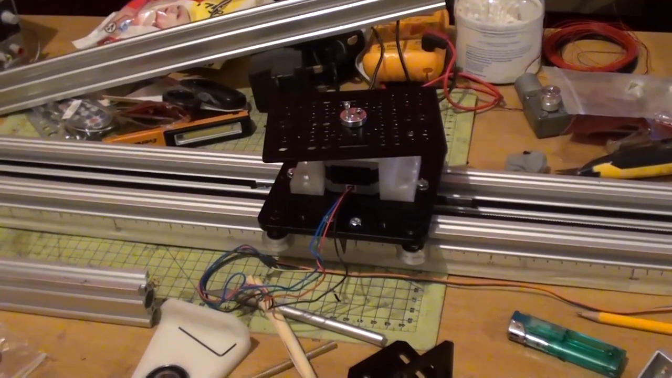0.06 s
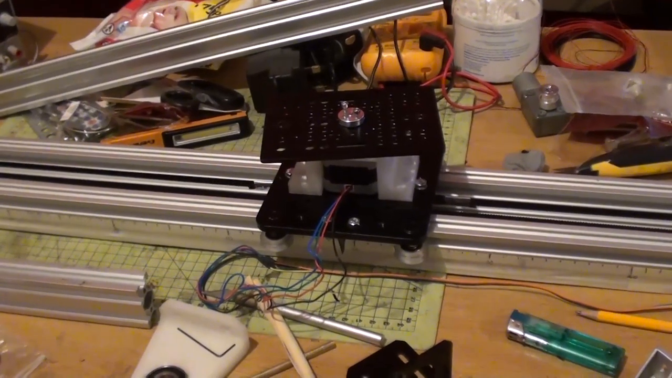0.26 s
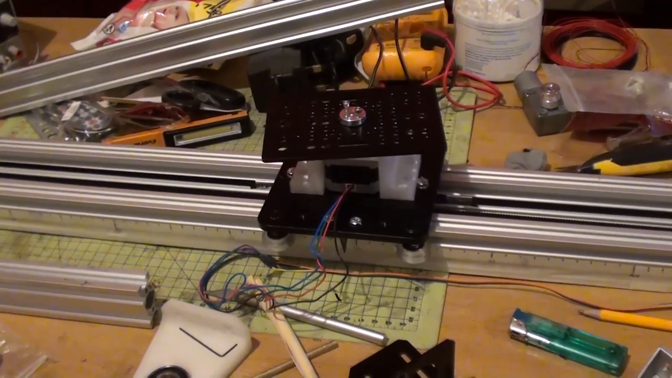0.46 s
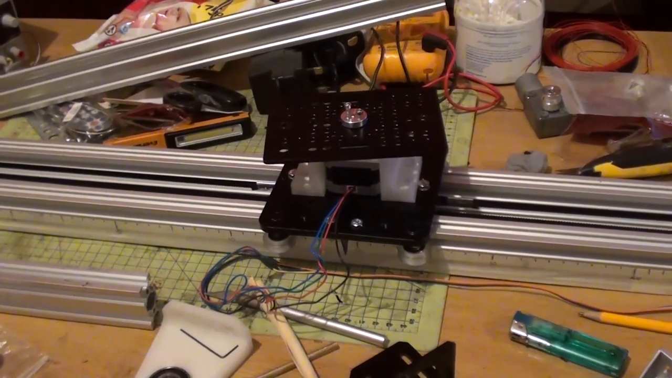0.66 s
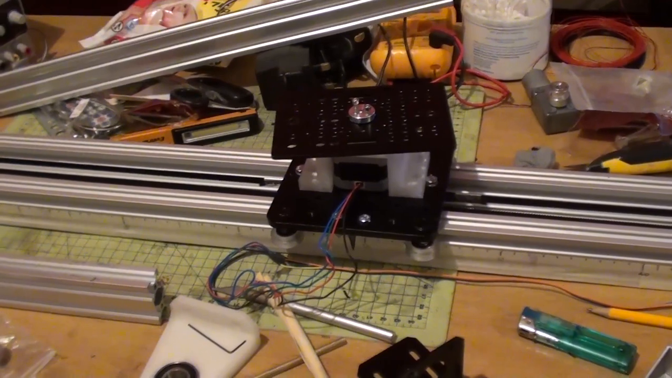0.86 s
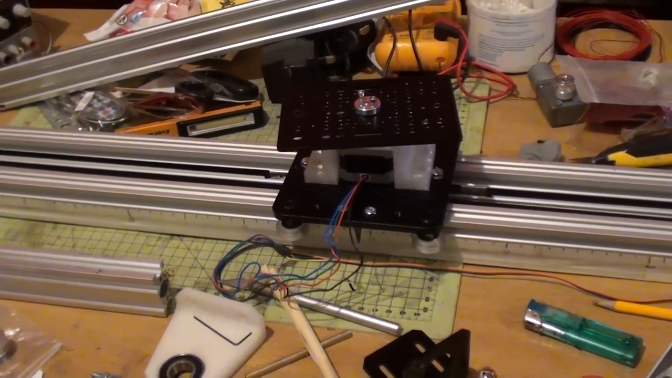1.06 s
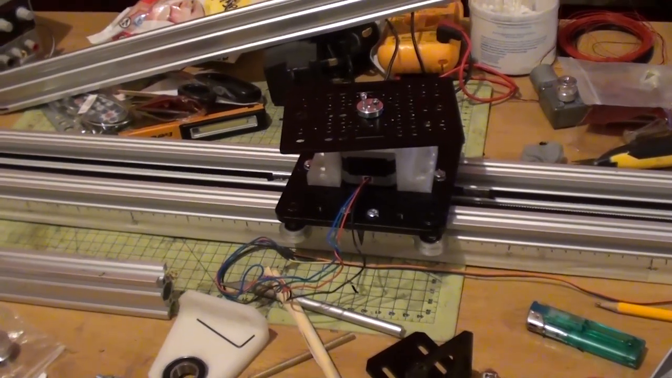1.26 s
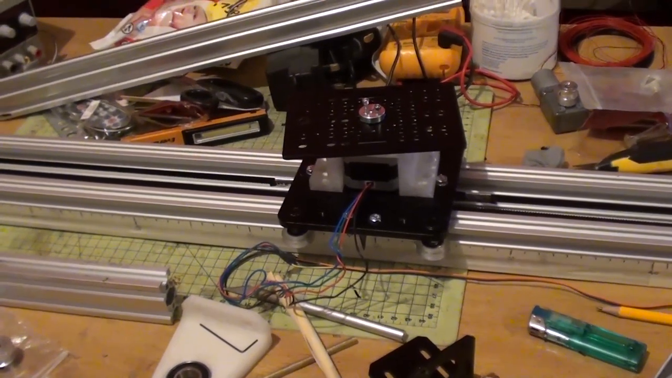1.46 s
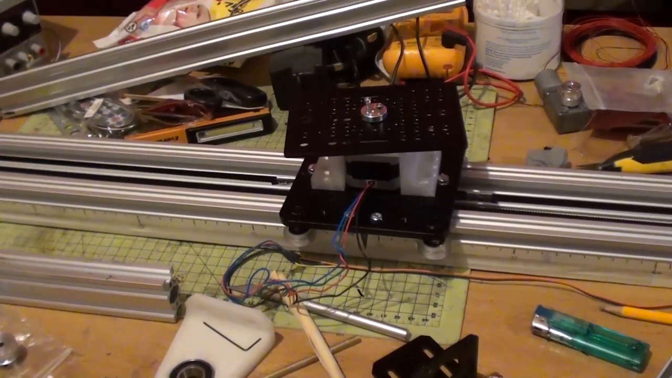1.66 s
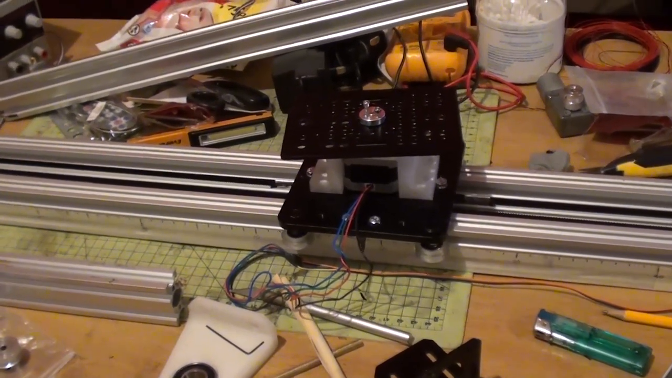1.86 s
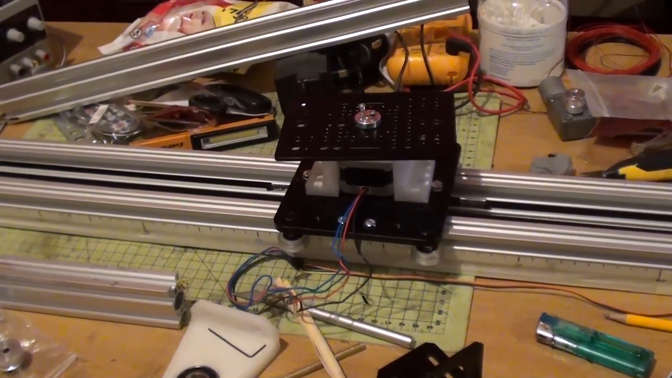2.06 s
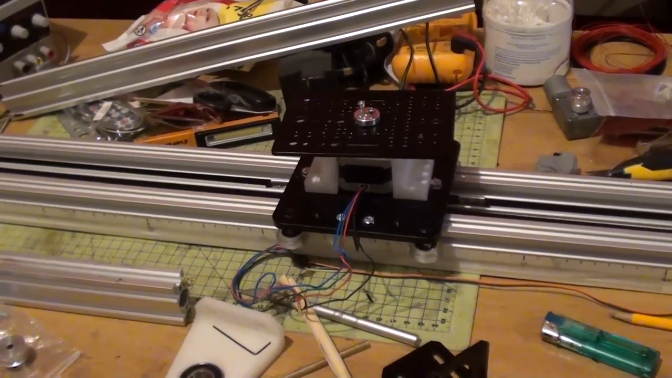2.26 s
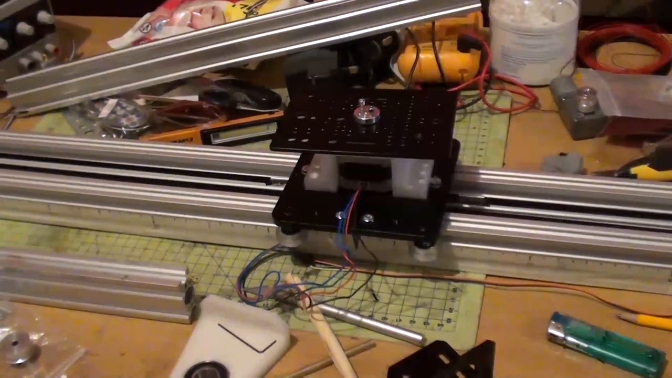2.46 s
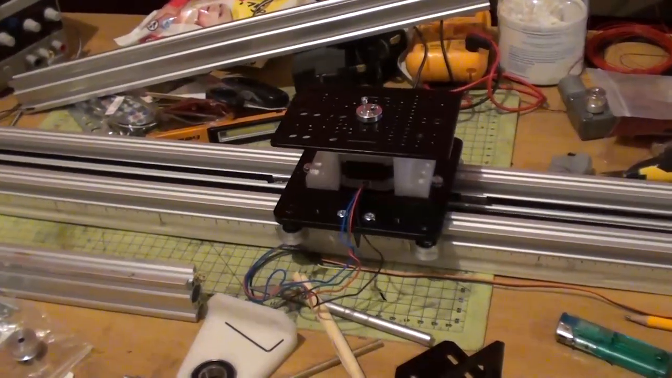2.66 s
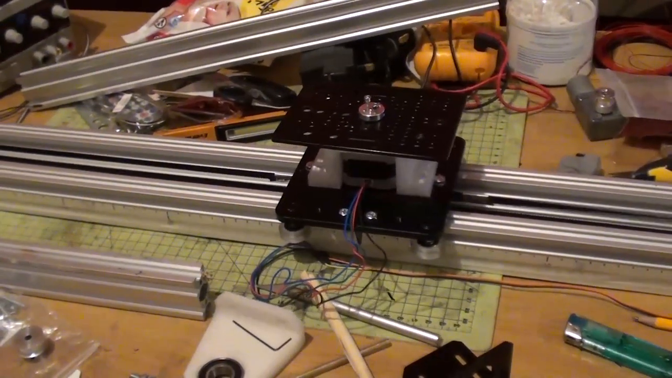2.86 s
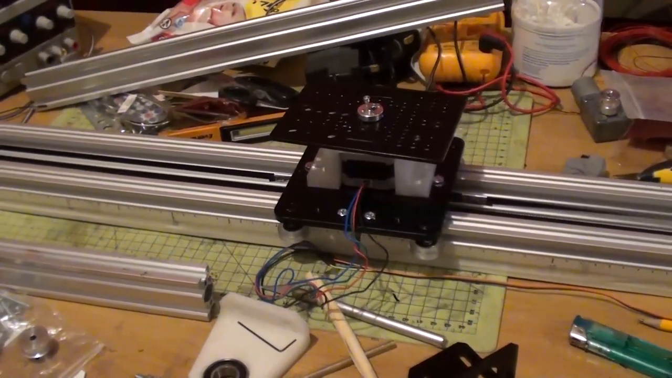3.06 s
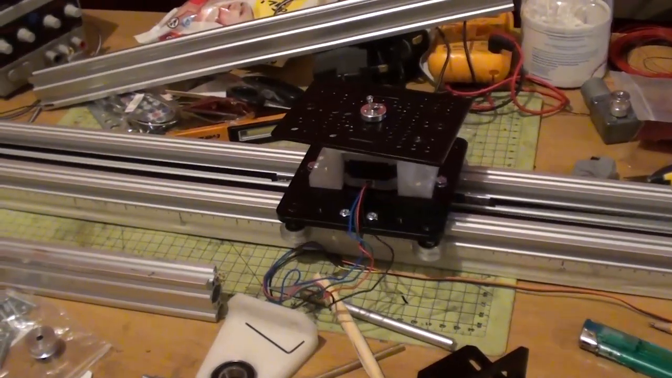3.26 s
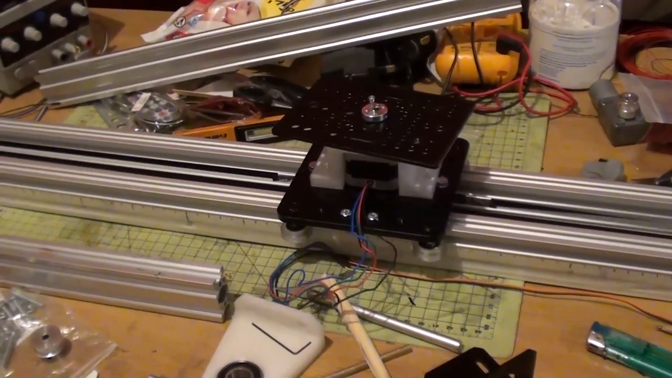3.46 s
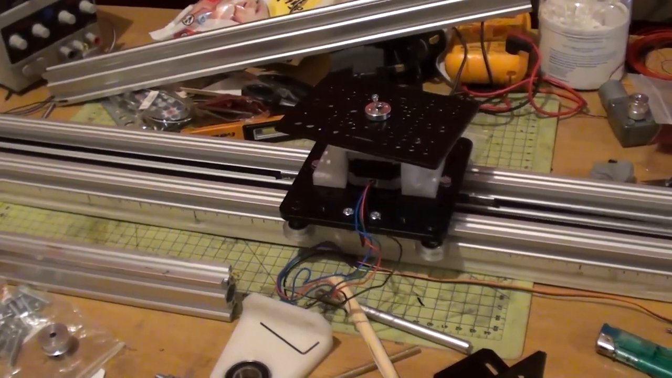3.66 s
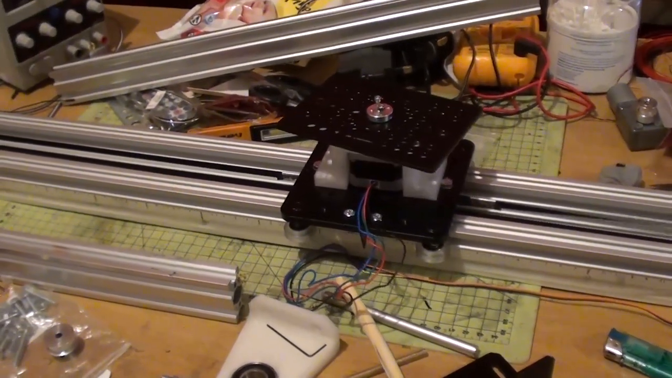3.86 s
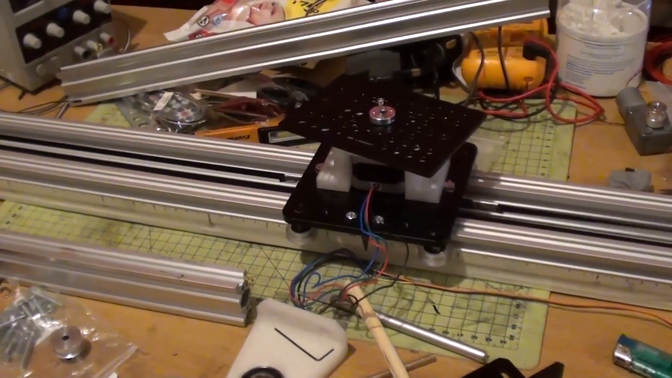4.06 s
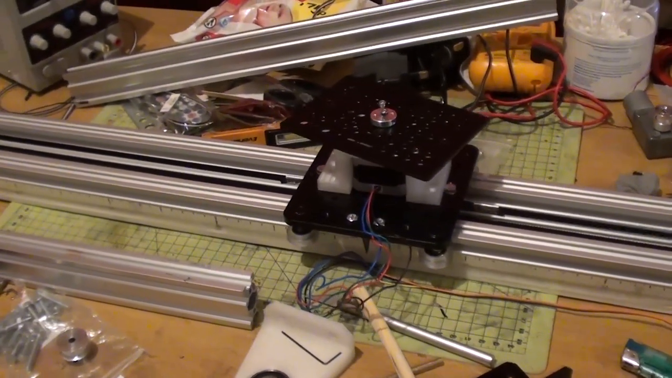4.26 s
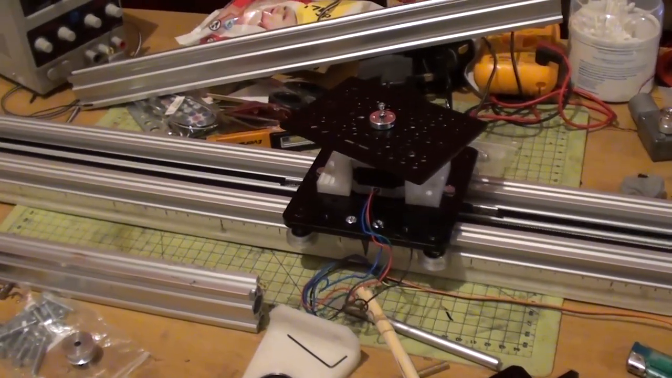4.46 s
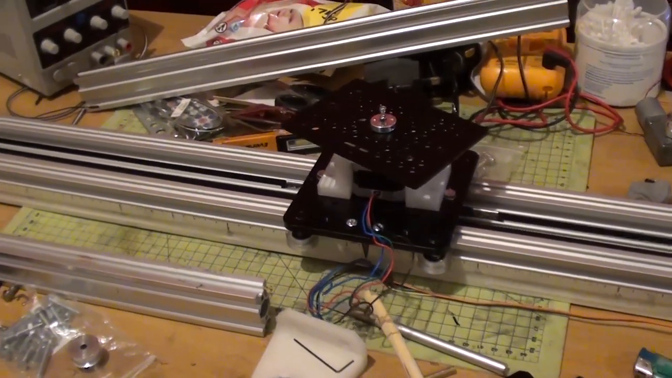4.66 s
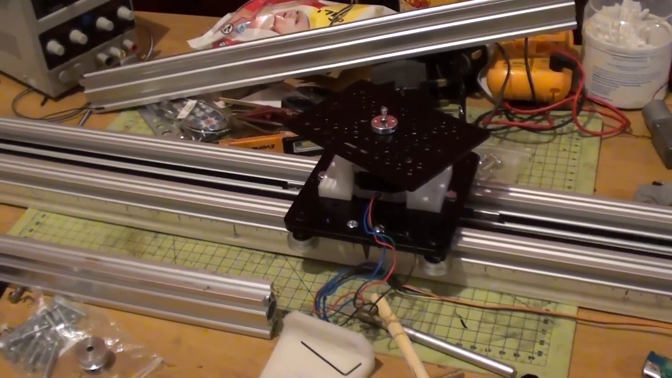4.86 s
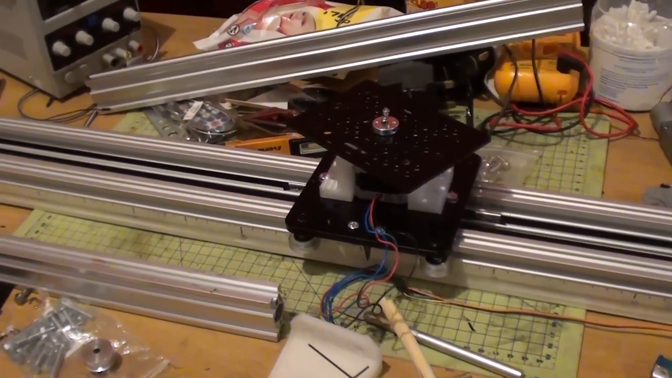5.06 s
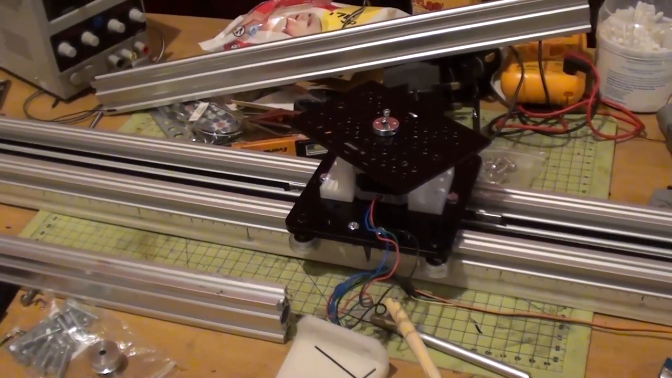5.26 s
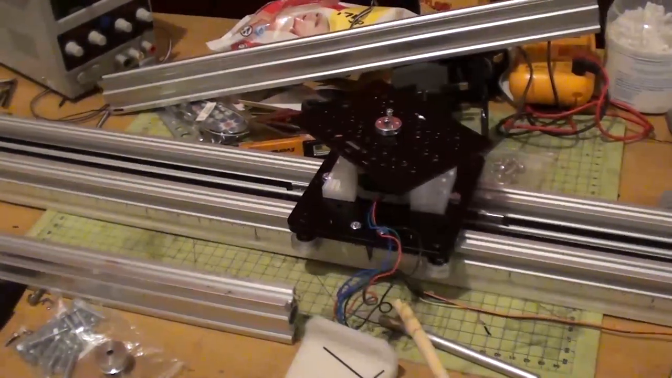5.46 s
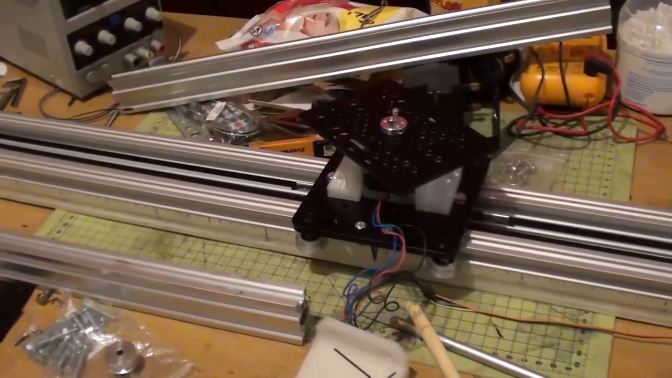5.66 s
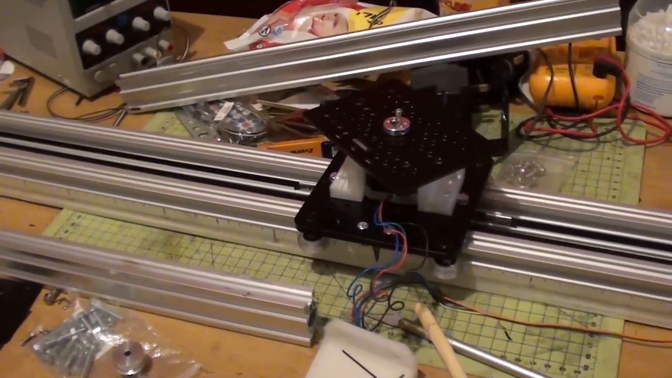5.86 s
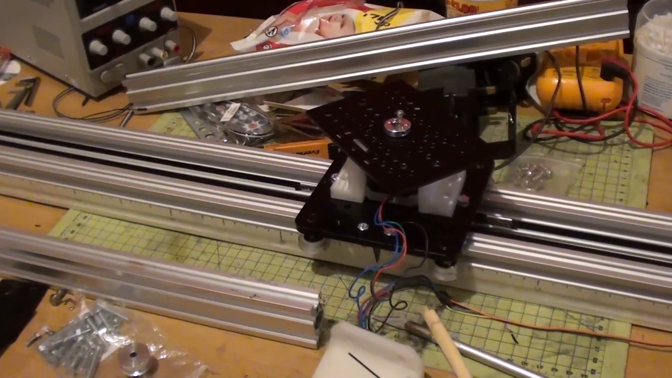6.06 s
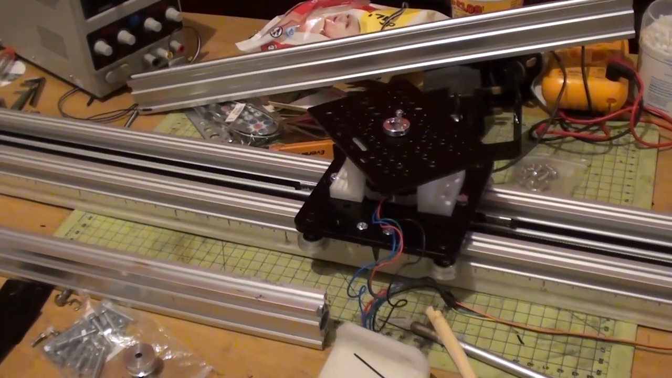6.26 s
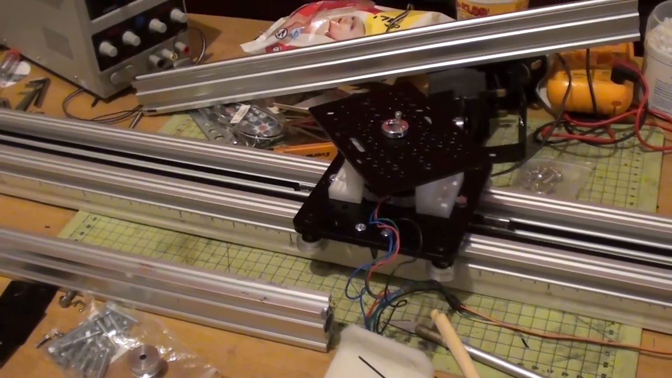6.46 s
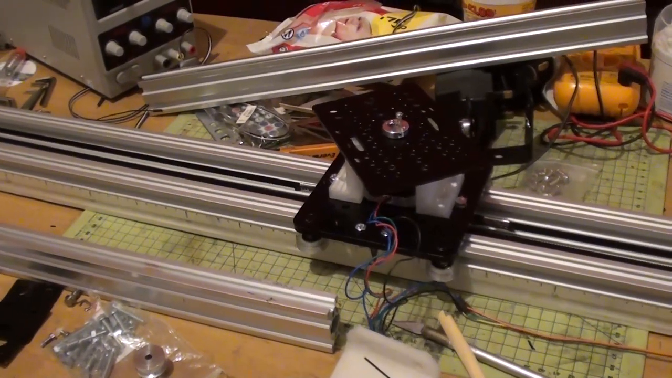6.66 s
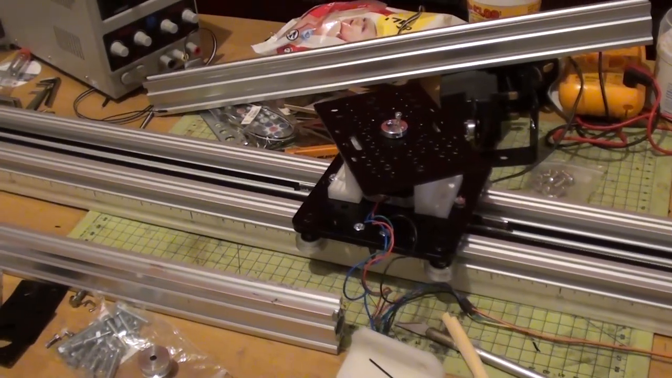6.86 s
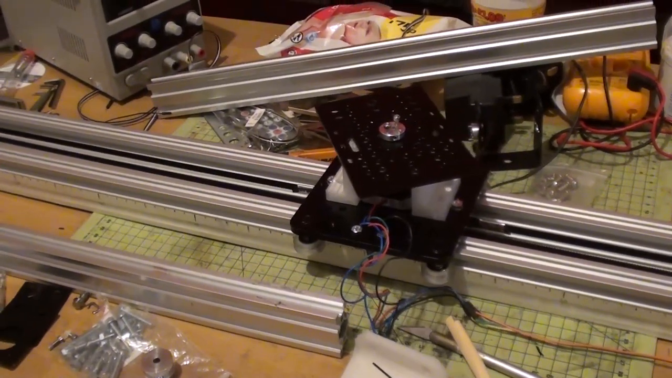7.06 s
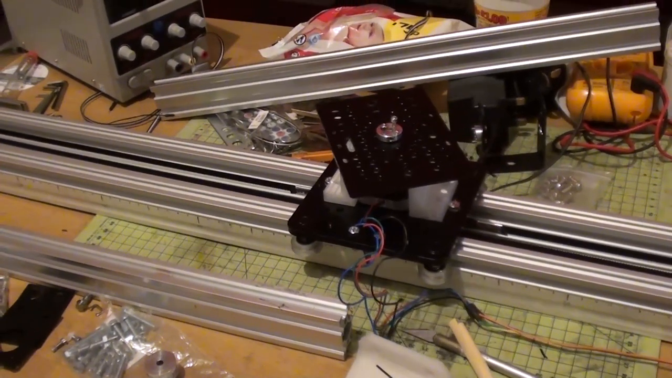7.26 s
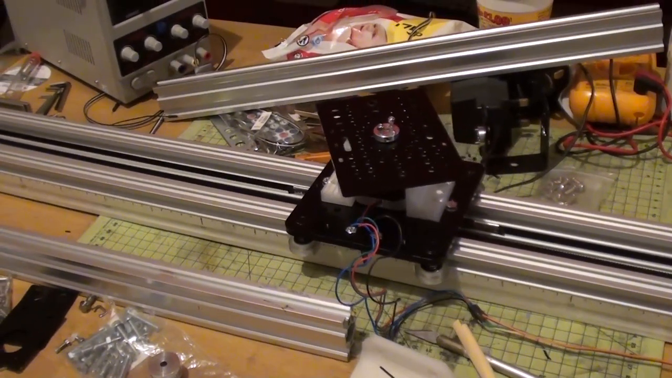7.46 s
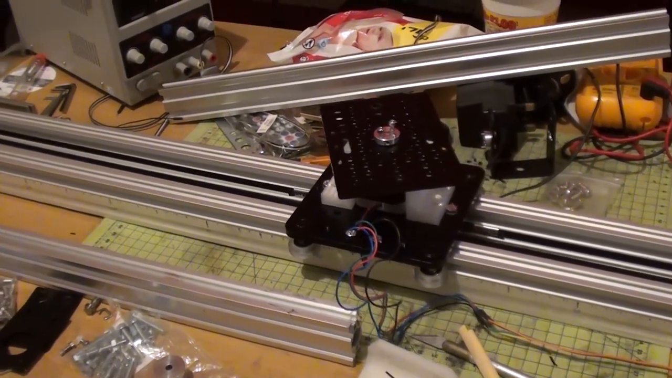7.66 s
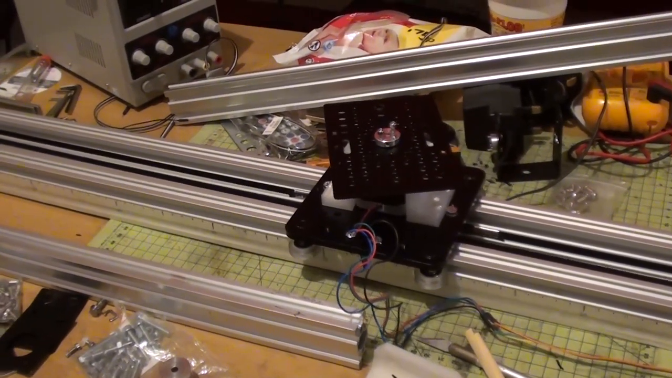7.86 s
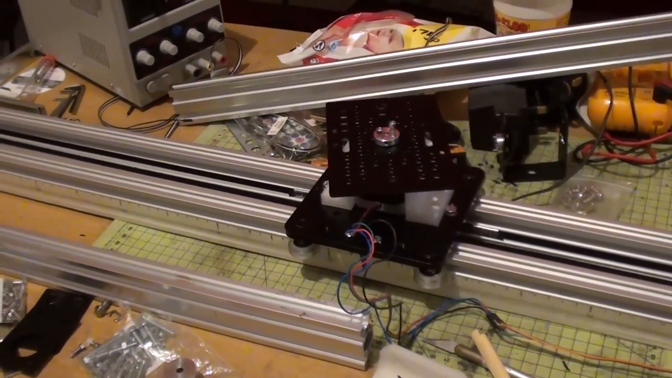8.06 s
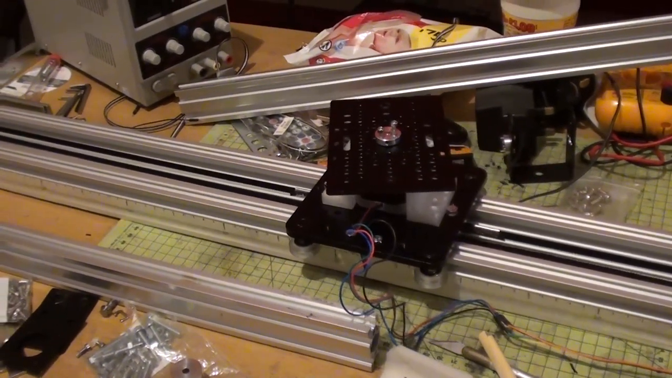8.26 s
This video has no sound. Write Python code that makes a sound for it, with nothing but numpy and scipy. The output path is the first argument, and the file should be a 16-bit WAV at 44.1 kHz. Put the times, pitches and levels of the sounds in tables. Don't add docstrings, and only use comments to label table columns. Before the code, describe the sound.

A switch clicks, a small motor sweeps up within half a second and drones at fixed pitch, with a passing loose rattle and thin squeals.

```python
import sys
import numpy as np
from scipy import signal
from scipy.fft import rfft, irfft
from scipy.io import wavfile
from scipy.ndimage import uniform_filter1d

SR = 44100
rng = np.random.default_rng(int(sys.argv[2]) if len(sys.argv) > 2 else 0)


def volts(x):
    e = np.asarray(x, float) / 20
    return 10 ** e


def master_out(mix):
    frames = np.transpose(np.atleast_2d(mix))
    ceiling = np.clip(frames, -1, 1)
    pcm = np.round(ceiling * 32767).astype(np.int16)
    wavfile.write(sys.argv[1], SR, pcm)


N = 366912
T = np.arange(N) / SR
COIL_HZ, STEPS = 77.795, 16
EARS = np.array([[.5], [-.5]])


def read(table, off_db=-120):
    s, *columns = np.transpose(table)
    return [np.interp(T, s, column, off_db, off_db) for column in columns]


def unit(x):
    return x / np.sqrt(np.mean(x ** 2))


def sos(x, order, hz, kind="low"):
    return signal.sosfilt(signal.butter(order, hz, kind, fs=SR, output="sos"), x)


def ring(x, modes, treble_db=0):
    out = 0
    for k, (hz, width, db) in enumerate(modes):
        gain = (-1) ** k * volts(db + treble_db * (hz > 1500))
        out = out + gain * signal.lfilter(*signal.iirpeak(hz, hz / width, SR), x)
    return out


def coloured(spectrum):
    hz, db = np.transpose(spectrum)
    axis_hz = np.fft.rfftfreq(N, 1 / SR) + 1
    shape = volts(np.interp(np.log(axis_hz), np.log(hz), db))
    return unit(irfft(rfft(rng.standard_normal(N)) * shape, N))


def walk(rate):
    knots = rng.standard_normal(int(N / SR * rate) + 2)
    return 0.71 * np.interp(np.arange(N) * rate / SR, np.arange(len(knots)), knots)


def bumps(events, width_s):
    return sum(db * np.exp(-((T - s) / width_s) ** 2) for s, db in events)


def strikes(at, size):
    x, i = np.zeros(N + 2), np.clip(at, 0, N).astype(int)
    np.add.at(x, i, size * (1 - at % 1))
    np.add.at(x, i + 1, size * (at % 1))
    return x[:N]


def when(turns, marks):
    return np.interp(marks, turns, np.arange(N))


def place(x, pan_db):
    return x * volts(EARS * pan_db)


# t/s, share of full speed
SPEED = [(1.525, 0.), (1.526, .075), (1.6, .16), (1.661, 0.26), (1.74, .41), (1.82, .58), (1.95, 0.82),
         (2.04, 1.)]


def spin_up():
    speed = np.interp(T, *np.transpose(SPEED))
    return speed, np.cumsum(speed * COIL_HZ / SR + 1e-12)


# f/Hz, width/Hz, level/dB
FRAME = [(227, 20, 3.5), (380, 36, -11), (481, 9.1, 8), (717, 36, 2.5), (827, 48, -2.5), (1017, 10.7, 10.5),
         (1295, 10, 7.5), (1536, 75, -2), (1715, 42, 1), (2010, 9.6, -5), (2800, 19, 1), (2973, 15, -0.5),
         (3350, 40, -24), (4250, 92, -8.5)]
# t/s, level/dB
HUM = [(1.6, -63), (1.9, -42), (2.05, -41.5), (2.3, -39.5)]
# t/s, left minus right level/dB
STEP_PAN = [(2.05, 3.5), (2.92, 4.0), (3.83, 6), (4.91, 10), (5.28, 9), (5.73, 9.5), (7.11, 6.5), (7.8, 6),
            (8.32, 6)]
# multiple, mean level/dB, lobe depth/dB, loudest t/s
LOBES = [(1, -30, 0.7, 2.6), (2, -23.5, 3.0, 4.0), (3, -8.0, 1.5, 4.0), (4, -18.5, 5.0, 1.25),
         (5, -14.5, 5.5, 6.64), (6, -14.5, 1.0, 3.8), (7, -21.5, 1.4, 2.0), (8, -25.5, 10.0, 4.59),
         (9, -2.5, 1.3, 5.92), (10, -10.0, 4.0, 3.3), (11, -15.5, 4.4, 3.9), (12, -30.0, 2.0, 3.21),
         (13, -3.5, 0.9, 7.6), (14, -12.0, 1.0, 7.1), (15, -6.0, 3.5, 7.3), (16, -2.0, 3.0, 1.24),
         (17, -15.0, 2.6, 2.8), (18, -38.5, 15.0, 3.1), (19, -21.0, 3.0, 6.5), (20, -7.5, 2.0, 5.7),
         (21, -17.0, 5.0, 3.5), (22, -11.0, 0.1, 8.1), (23, -26.4, 3.2, 7.98), (25, -41.0, 18.0, 4.0),
         (31, -26.0, 4.5, 4.5), (32, -17.5, 3.5, 5.3), (33, -25.0, 7.6, 6.2), (34, -29.0, 0.0, 0.88),
         (35, -25.0, 4.0, 1.4), (42, -26.0, 6.5, 4.0)]
TURN_S = 8


def hum(turns, speed):
    axis_hz = np.arange(0, 3500, 5.)
    frame = sum(volts(db) / np.hypot(1, 2 * (axis_hz - hz) / width) for hz, width, db in FRAME)
    every = np.arange(0, N, 64)
    step_pan = read(STEP_PAN, off_db=3)[0][every]
    cycle = np.exp(2j * np.pi * turns)
    out, wave, reached = 0, np.ones(N, complex), 0
    for k, mean_db, lobe_db, loudest in LOBES:
        k = round(k)
        start, pan, lag = rng.uniform(-0.52, 1, 3)
        moving = np.interp(k * COIL_HZ * speed[every], axis_hz, frame)
        crossing = moving / np.interp(k * COIL_HZ, axis_hz, frame)
        lobe = lobe_db * np.cos(2 * np.pi * (every / SR - loudest) / TURN_S)
        gain = volts(mean_db + lobe + 0.78 * walk(6)[every]) * np.minimum(crossing, 3.)
        gain = gain * speed[every] ** (k * k / 100 + 6 / k ** 2)
        pan_db = step_pan if k == STEPS else 3.4 * pan * min(k / 9, 1)
        ears = place(gain, pan_db) * np.exp(1j * np.pi * start + .3j * lag * EARS)
        wave, reached = wave * cycle ** int(k - reached), k
        out = out + np.real(wave * np.repeat(ears, 64, axis=1)[:, :N])
    return np.sqrt(2) * out * volts(np.interp(T, *np.transpose(HUM), left=-120))


# t/s, level/dB
KICK = [(1.52, -28), (1.62, -34.5), (1.652, -36), (1.66, -30), (1.69, -33), (1.81, -32.5), (1.98, -32),
        (2.01, -41), (2.07, -70)]
# f/Hz, width/Hz, level/dB
ROTOR = [(233, 35, -9), (396, 24, -2.5), (479, 11, -5)]
SWING_DB, SWING_FALL_DB_S, SWING_BEAT_S, SWING_BEAT_DB, SWING_PEAK_S = 9, 55, .085, 1.5, 1.63


def kicks(turns):
    step = np.arange(25 * STEPS)
    chance = rng.standard_normal((len(step), 2)).T
    size = volts(6.5 * np.cos(2 * np.pi * (step / STEPS + .3)) + 1.5 * chance[0])
    push = sos(strikes(when(turns, (step + .04 * chance[1]) / STEPS), size), 2, 1500)
    since = np.clip(T - SWING_PEAK_S, -.1, None)
    force_db = read(KICK)[0]
    beat_db = SWING_BEAT_DB * np.cos(2 * np.pi * since / SWING_BEAT_S)
    swing_db = force_db + SWING_DB - SWING_FALL_DB_S * since + beat_db
    frame, rotor = ((push * volts(db))[:3 * SR] for db in (force_db, swing_db))
    return 30 * np.pad(ring(frame, FRAME) + ring(rotor, ROTOR), (0, N - len(frame)))


# f/Hz, level/dB per Hz
GRIND = [(60, -26), (150, -4.5), (350, 1), (800, -1.5), (1100, 3), (1700, -4.5), (2200, -8.5), (3000, -16),
         (4500, -16.5), (6500, -17), (8500, -16.5), (11000, -23), (16000, -25)]
# t/s, level/dB
GRIND_LEVEL = [(1.52, -62), (1.54, -53), (2.1, -47), (4.4, -46.5), (6.5, -47), (8.32, -46.5)]


def grind(turns):
    return coloured(GRIND) * volts(read(GRIND_LEVEL)[0] + 2 * np.cos(2 * np.pi * turns) + 0.92 * walk(12))


def whistle(hz, db, locked_hz, turns, width_hz, steady, duty, depth, patchy_db):
    band = (walk(width_hz) + 1j * walk(width_hz)) * np.exp(2j * np.pi * np.cumsum(hz) / SR)
    line = steady * np.cos(2 * np.pi * locked_hz * T + 0.3 * walk(25))
    gate = 1 - depth / (1 + np.exp(6 * (np.cos(2 * np.pi * (turns - .3)) + duty)))
    return unit((band.real + line) * gate * volts(patchy_db * walk(35))) * volts(db)


# t/s, f/Hz, level/dB
CHIRP = [(1.53, 7320, -61.5), (1.87, 7310, -62), (2.1, 7400, -57), (2.9, 7430, -55), (3.5, 7400, -52),
         (3.7, 7330, -53), (4.3, 7250, -52), (4.4, 7250, -61), (4.63, 7230, -63.5), (5.63, 7380, -59),
         (7.6, 7380, -58), (8.32, 7330, -60.5)]
# t/s, level over the chirp/dB
FLARES = [
    (1.55, 9.9),
    (1.61, 15),
    (8.09, 7.5),
    (8.23, 12),
]
FLARE_S = 0.0092
LOCKED = 96


def chirp(turns):
    tone = whistle(*read(CHIRP), LOCKED * COIL_HZ, turns,
                   width_hz=420, steady=0.63, duty=0.17, depth=0.63, patchy_db=-0.5)
    return volts(bumps(FLARES, FLARE_S)) * tone


# f/Hz, width/Hz, level/dB
RUMBLE = [(123, 29, -1), (145, 23, 0), (198, 16.7, 5.5)]
THUD = [(333, 43, 0.5), (371, 80, 0), (435, 78, -1), (573, 187, -9)]
KNOCK = [(650, 94.5, 2.5), (853, 98, 0), (992, 49, 1.5), (1130, 140, -4), (1520, 75, -3.5),
         (1780, 130, -11.5), (2050, 193, -9), (2537, 120, -16.5), (3040, 740, -24)]
TICK = [(4300, 2700, 0), (5900, 1400, -2.5), (5780, 160, -9), (6630, 450, 8), (7900, 380, 7)]
BRIGHT = [(9200, 500, -5), (9230, 270, 9), (11400, 1920, -6)]
# f/Hz, width/Hz, level/dB
TAB = [(5830, 150, 1), (9900, 270, 2)]
# t/s, hard-soft alternation/dB, disorder
LOOSENESS = [(2.05, 0, .45), (3.3, 1, .4), (3.42, 3.5, .5), (3.85, 3.5, .55), (3.95, 2, 1.), (4.06, 4, 1.),
             (4.8, 3, 1.)]
# t/s, level/dB
SHAKE = [(2.05, -30), (2.09, -11), (2.8, -7.5), (2.96, -1), (3.1, 0.5), (4.2, -1.5), (4.36, -0.5),
         (4.41, -8.5), (4.8, -13)]
# t/s, share
JAM = [(3.35, 0.), (3.39, 1.), (4.06, 1.), (4.1, 0.)]
LIFT_S, LIFT_DB_S = 4.34, 250
# t/s, level/dB
SLAPS = [
    (4.07, 10),
    (4.095, 7.2),
    (4.12, 10),
    (4.146, 8),
    (4.2, 10),
    (4.25, 5.9),
]
# t/s, level/dB
PAUSE = [
    (2.885, -12),
]
# t/s, level/dB
GROAN = [
    (3.99, 4.8),
]
SLAP_S, PAUSE_S, GROAN_S = 0.0099, 0.034, 0.08


def chatter(turns):
    cycle = np.arange(int(turns[-1]))
    chance = rng.standard_normal((len(cycle), 8)).T
    swing_db, disorder = read(LOOSENESS, off_db=0.5)
    at = when(turns, cycle + .35 + 0.0137 * chance[0])
    alternate_db = swing_db[at.astype(int)] * (-1) ** cycle
    uneven, even = (unit(strikes(at, volts(share * alternate_db + 1.9 * chance[1]))) for share in (1, .3))
    delays = np.array([[.27], [.55], [.78]])
    bounce_at = when(turns, cycle + .35 + delays + 0.072 * chance[2:5])
    bounce = unit(strikes(bounce_at.ravel(), volts(1.1 * chance[5:]).ravel()))
    shake = rng.standard_normal(N) * volts(2 * walk(40))
    mixes = [(RUMBLE, uneven, .5, .3, -46.5, 3, -4, 1, 0, 1),
             (THUD, uneven, .6, .3, -40, 1.5, 4, 1.5, 0, 1),
             (KNOCK, even, 1.8, 1.6, -35.2, 1.5, 3.7, -2.5, 0, 0),
             (TICK, uneven, 1.5, 2.2, -51.5, 1.2, 2, 1.5, 1, 0),
             (BRIGHT, uneven, .5, .8, -58, 1.05, 3, 1.5, 1, 0),
             (TAB, uneven, .4, .5, -52.5, 1.05, -6, -8, 1, 0)]
    force_db, jam = read(SHAKE)[0], read(JAM, off_db=0)[0]
    slipped = (1 - jam) * (T > JAM[-2][0])
    slap_db, groan_db = bumps(SLAPS, SLAP_S), bumps(GROAN, GROAN_S)
    edge_db = bumps(PAUSE, PAUSE_S) - LIFT_DB_S * np.clip(T - LIFT_S, 0, None)
    out = 0
    for modes, land, bounce_share, shake_share, db, slope, jam_db, slip_db, edge, groans in mixes:
        level_db = db + slope * force_db + jam_db * jam + slip_db * slipped
        level_db = level_db + groans * groan_db + edge * edge_db
        loose = disorder * (bounce_share * bounce + shake_share * shake)
        out = out + volts(level_db) * unit(ring(land * volts(edge * slap_db) + loose, modes))
    return sos(out, 4, 105, "high")


# t/s, length/s, level/dB
SQUEAL = [
    (3.46, .075, -50),
    (3.585, .04, -56),
    (3.655, .19, -54),
    (3.868, 0.11, -49),
    (4.06, .025, -51),
    (4.1, .07, -52),
    (4.195, 0.061, -53),
    (4.31, .03, -50),
    (4.34, 0.038, -60),
]
SQUEAL_HZ = 11121
BETWEEN_DB, EDGE_S = -55.5, 0.021
GRAB_RATE = 52


def squeal(turns):
    level = volts(BETWEEN_DB) * ((T > SQUEAL[0][0]) & (T < sum(SQUEAL[-1][:2])))
    level = level + sum(volts(db) * ((T > s) & (T < s + length)) for s, length, db in SQUEAL)
    tone = whistle(np.full(N, SQUEAL_HZ), 0, SQUEAL_HZ, turns,
                   width_hz=150, steady=0.67, duty=0.69, depth=0.31, patchy_db=-1.0)
    grab = .75 + .35 * np.tanh(4 * (walk(GRAB_RATE) + .3))
    return uniform_filter1d(level, size=int(EDGE_S * SR)) * tone * grab


# first t/s, peak level/dB, extra level on every second tooth/dB, f/Hz
TEETH = [
    (4.3690, -50, 1, 10100),
    (4.4424, -52.5, -1, 9400),
    (4.4525, -57, 5.5, 5310),
    (4.5060, -53.5, -2, 5750),
]
TOOTH_S = .14688


def teeth():
    out, t = np.zeros(N + SR), np.arange(700) / SR
    shape = np.minimum(t / 0.0022, 1) * np.exp(-(t / 0.0053) ** 3)
    for first, db, second_db, hz in TEETH:
        for k, (late, size, pitch) in enumerate(rng.standard_normal((27, 3))):
            i = int((first + k * TOOTH_S + .0018 * late) * SR)
            level = volts(db + second_db * ((k + 1) % 2) + 1.9 * size)
            out[i:i + len(t)] += level * shape * np.sin(2 * np.pi * hz * (1 + .016 * pitch) * t)
    return out[:N]


def clicks(events, modes):
    out, t = np.zeros(N), np.arange(4000) / SR
    for s, db, treble_db in events:
        touch = (4.7 * (t == 0) + rng.standard_normal(len(t))) * np.exp(-t / 0.0015)
        hit = ring(touch, modes, treble_db)
        out[int(s * SR):int(s * SR) + len(t)] += volts(db) * hit / np.abs(hit).max()
    return out


# t/s, peak level/dB, treble share/dB
BUTTON = [
    (1.3888, -23, 4),
    (1.481, -24.5, 5),
]
# f/Hz, width/Hz, level/dB
SWITCH = [(646, 55, 2), (875, 110, -1), (1520, 1100, -22), (2730, 410, -11), (4000, 360, -7.5),
          (4760, 900, -12.5), (5750, 520, -1.5), (7100, 270, -21), (7980, 23, 14), (7860, 230, 12),
          (9400, 1500, -14), (13000, 3600, -19)]
RELEASE_DAMP_DB = -6


def button():
    damped = [(hz, width, db + RELEASE_DAMP_DB * (7500 < hz < 8500)) for hz, width, db in SWITCH]
    return clicks(BUTTON[:1], SWITCH) + clicks(BUTTON[1:], damped)


# t/s, peak level/dB, treble share/dB
TAPS = [
    (0.383, -35.5, -5),
    (0.422, -40, -11),
    (0.587, -46, 2),
]
# t/s, peak level/dB, treble share/dB
CREAK = [
    (.774, -45, 0),
    (.795, -51, 0),
    (.812, -51, 0),
    (.83, -53, 0),
    (.846, -54, 0),
]
# f/Hz, width/Hz, level/dB
BENCH = [(766, 100, 8), (1400, 550, -6), (2300, 900, -1), (3500, 1400, -1), (5000, 700, 2), (6570, 900, 0)]
STRAP = [(2600, 200, -10), (4370, 60, 8), (5000, 600, -3), (5500, 60, 7), (7000, 500, -1)]


def handling():
    return clicks(TAPS, BENCH) + clicks(CREAK, STRAP)


ROOM_T60_S, ROOM_DB = 0.17, -7.5


def room(x):
    x = sos(x, 2, (900, 8500), "band")
    t = np.arange(int(.4 * SR)) / SR
    tail = rng.standard_normal((2, len(t))) * np.exp(-np.log(1000) * t / ROOM_T60_S) * (t > .003)
    tail = volts(ROOM_DB) * tail / np.sqrt(np.sum(tail[0] ** 2))
    return signal.fftconvolve(x[None], tail, axes=1)[:, :N]


# f/Hz, level/dB per Hz
HISS = [(12, -67), (20, -13), (110, -4), (142, -7.5), (163, -1.5), (499, -7.5), (542, -7.5), (780, -9.5),
        (923, -8), (1710, -13), (2140, -13.5), (2460, -13), (16000, -18.5)]
HISS_DB = -57.5


def hiss():
    noise = coloured(HISS) + 0.52 * coloured(HISS) * np.array([[1], [-1]])
    return noise * volts(HISS_DB + 0.14 * walk(7.6))


def scene():
    speed, turns = spin_up()
    motor = hum(turns, speed)
    rig = kicks(turns) + grind(turns) + chirp(turns) + chatter(turns) + squeal(turns) + teeth()
    small = button() + handling()
    return motor + place(rig, 0.43) + place(small, -1.4) + room(rig + small) + hiss()


def top_cut(x):
    return signal.sosfilt(signal.butter(12, 16240, fs=SR, output="sos"), x)


def record(dry):
    mid, side = (dry[0] + dry[1]) / 2, (dry[0] - dry[1]) / 2
    side = sos(sos(side, 2, 220, "high"), 3, 9500)
    side = side - 0.12 * sos(mid, 1, (2000, 9000), "band")
    top = signal.ellip(10, .2, 70, 15750, fs=SR, output="sos")
    mix = signal.sosfilt(top, [mid + side, mid - side])
    return top_cut(mix)


dry = scene()
out = record(dry)
master_out(out)
```